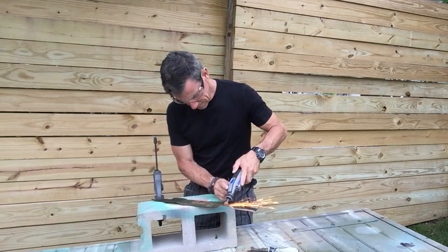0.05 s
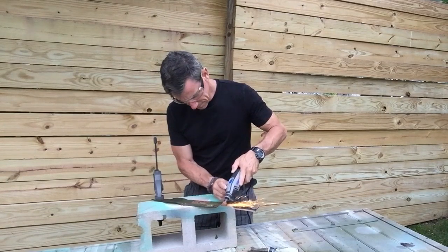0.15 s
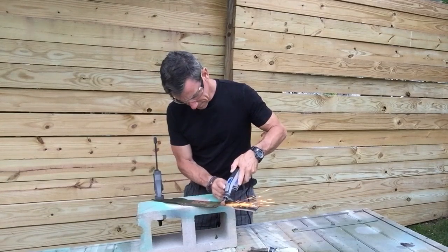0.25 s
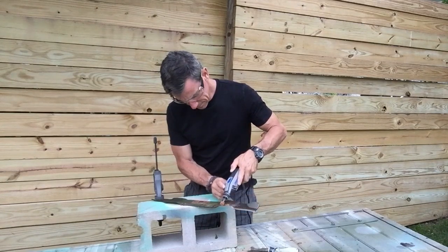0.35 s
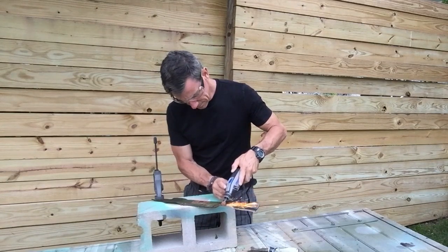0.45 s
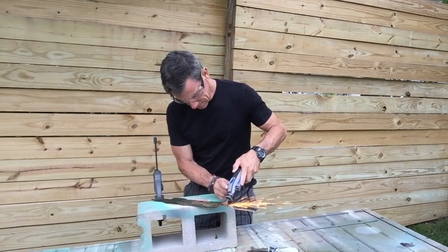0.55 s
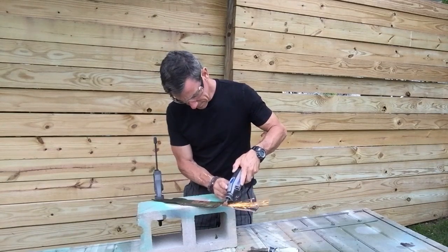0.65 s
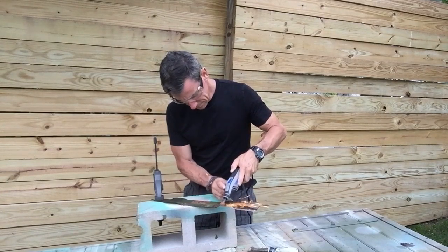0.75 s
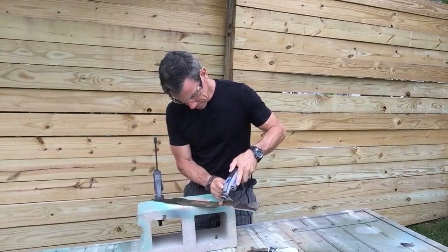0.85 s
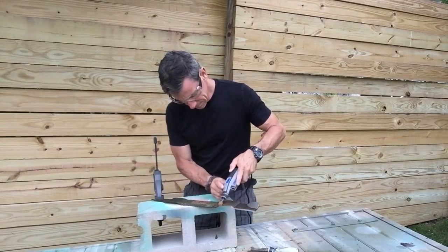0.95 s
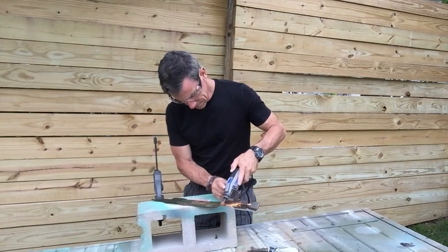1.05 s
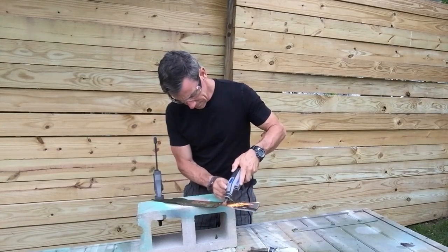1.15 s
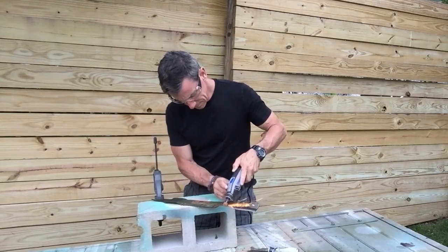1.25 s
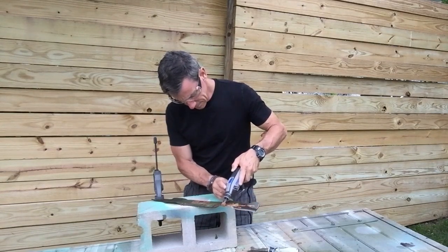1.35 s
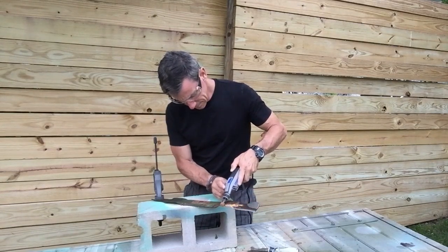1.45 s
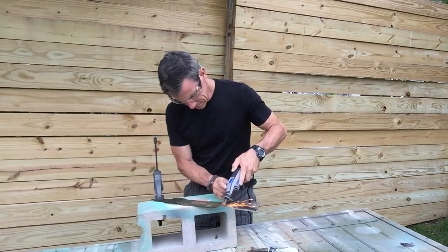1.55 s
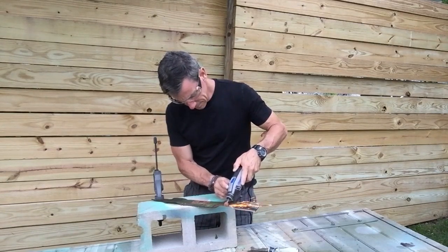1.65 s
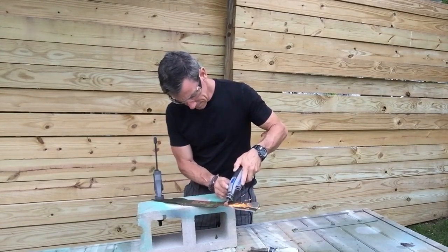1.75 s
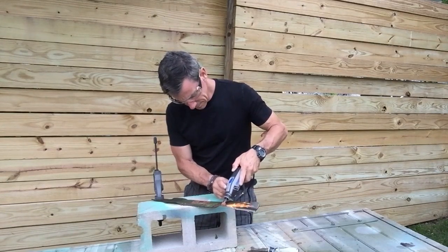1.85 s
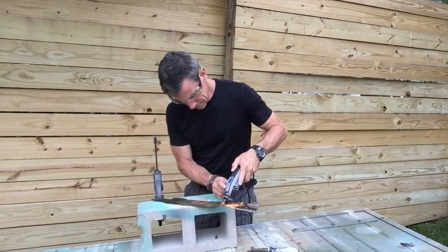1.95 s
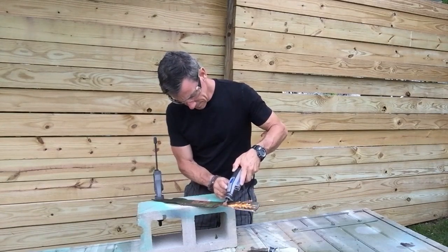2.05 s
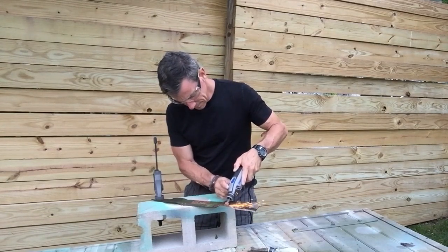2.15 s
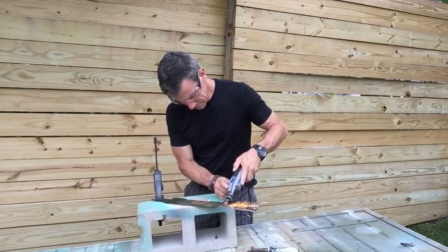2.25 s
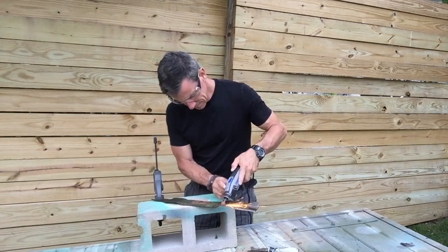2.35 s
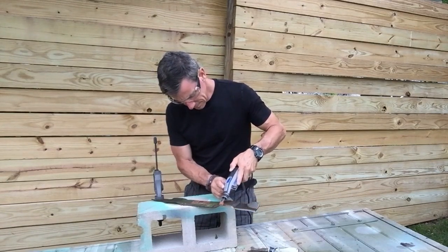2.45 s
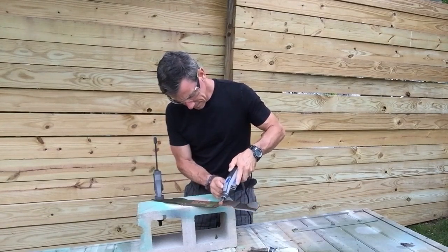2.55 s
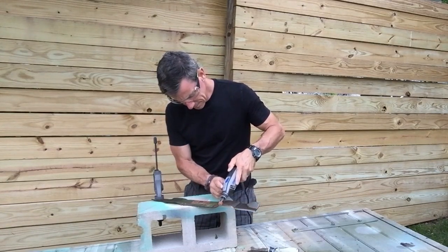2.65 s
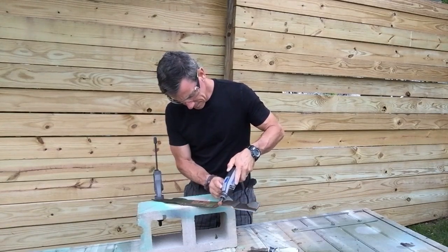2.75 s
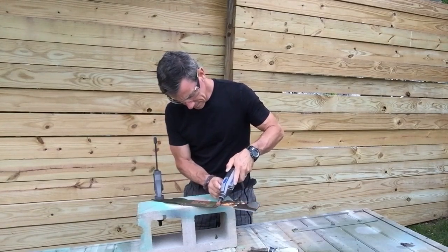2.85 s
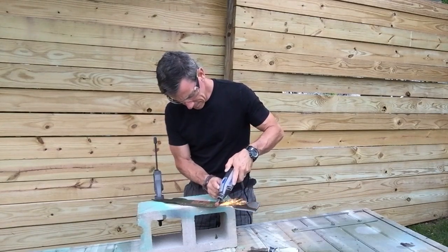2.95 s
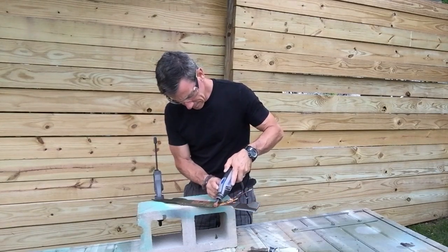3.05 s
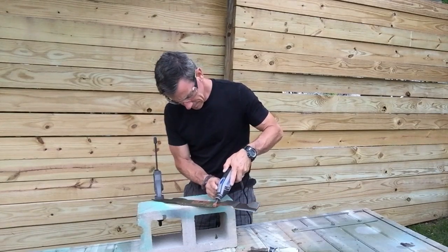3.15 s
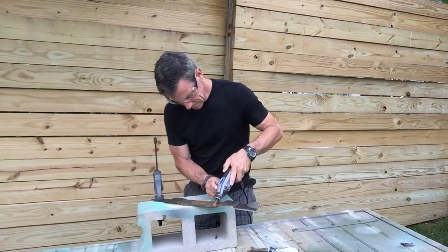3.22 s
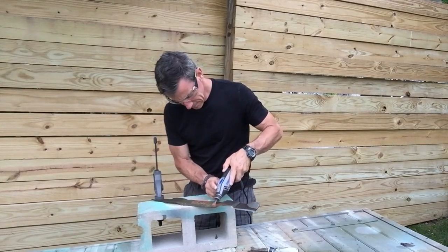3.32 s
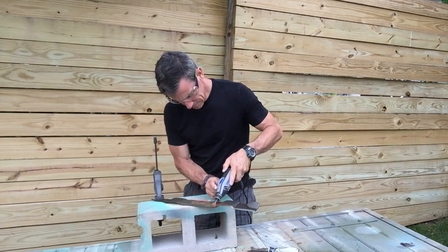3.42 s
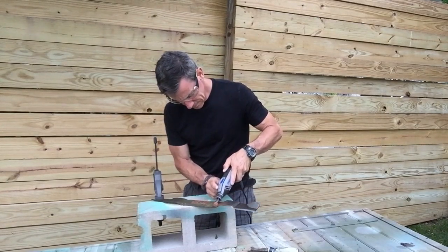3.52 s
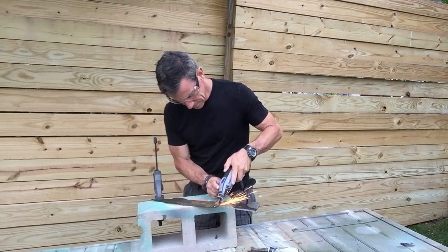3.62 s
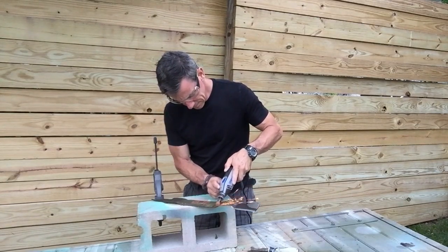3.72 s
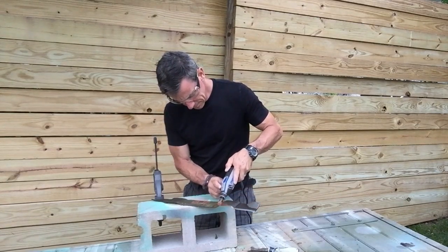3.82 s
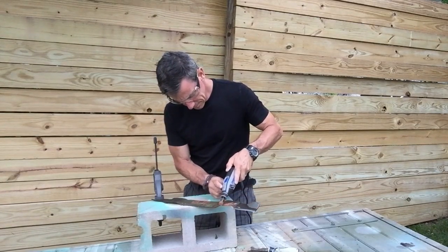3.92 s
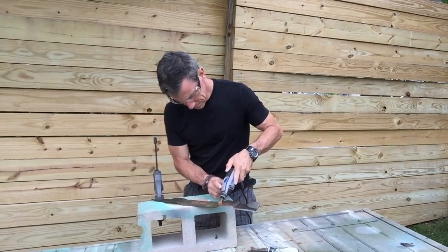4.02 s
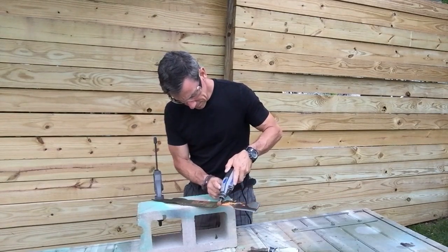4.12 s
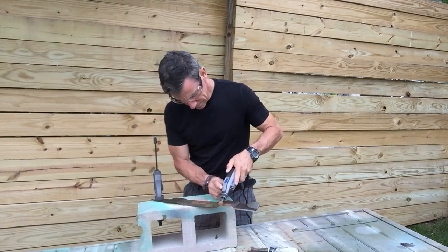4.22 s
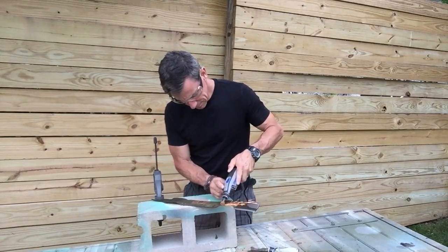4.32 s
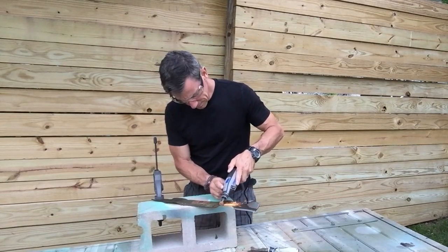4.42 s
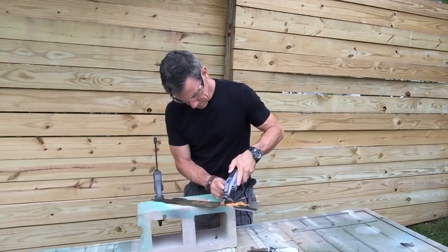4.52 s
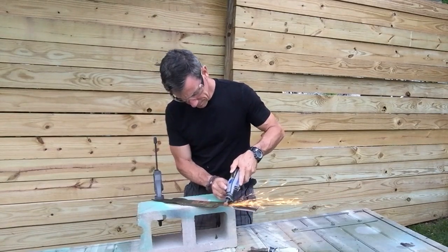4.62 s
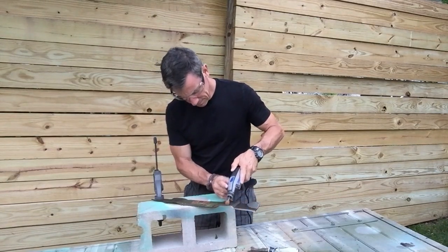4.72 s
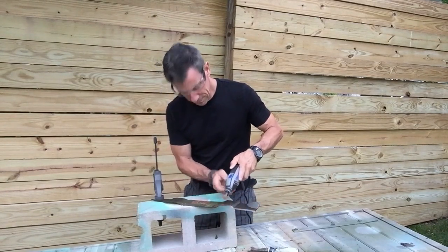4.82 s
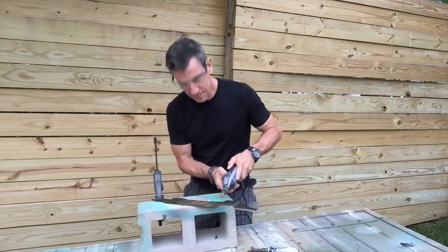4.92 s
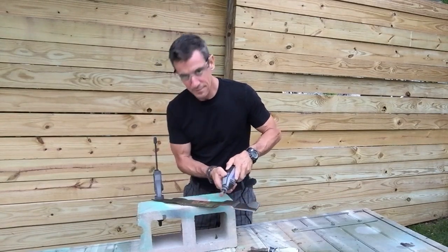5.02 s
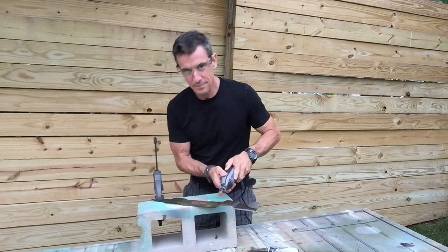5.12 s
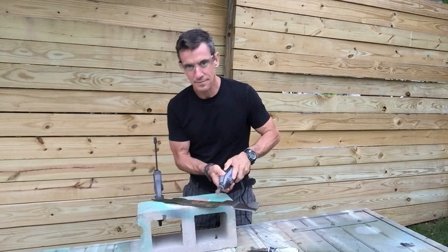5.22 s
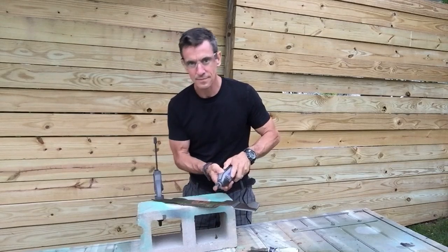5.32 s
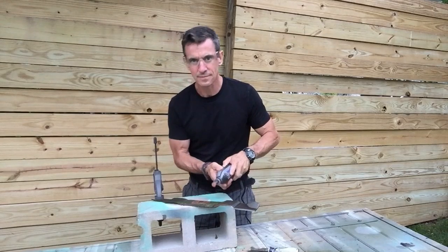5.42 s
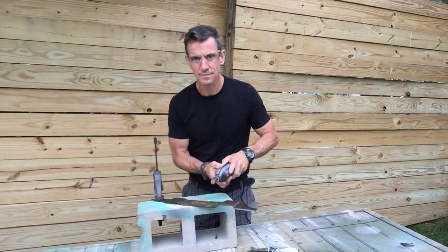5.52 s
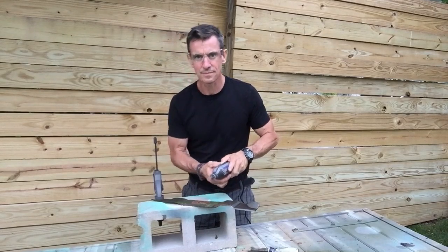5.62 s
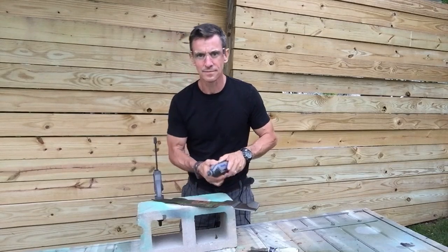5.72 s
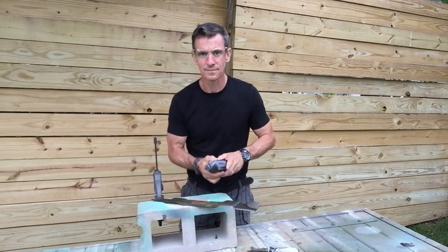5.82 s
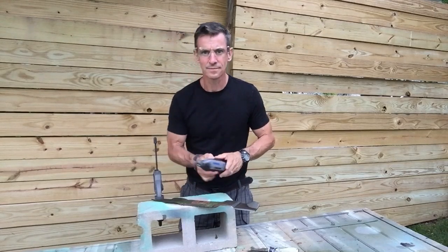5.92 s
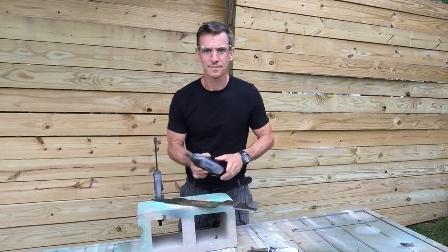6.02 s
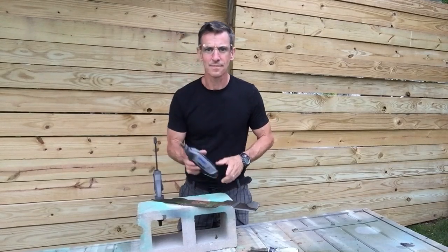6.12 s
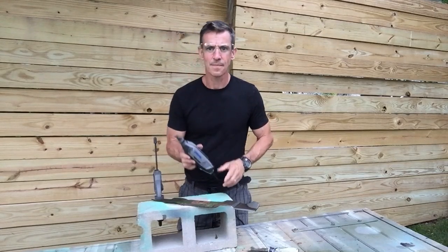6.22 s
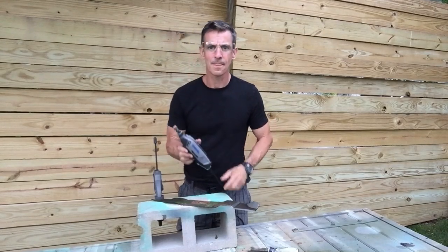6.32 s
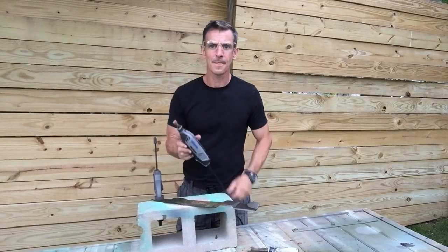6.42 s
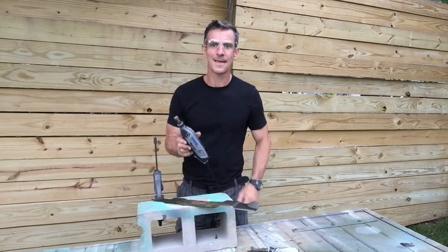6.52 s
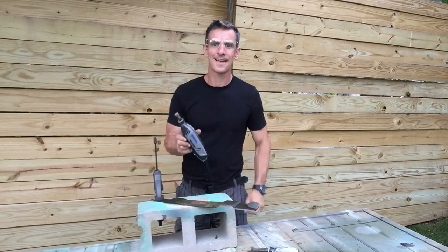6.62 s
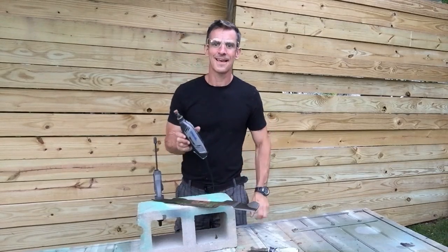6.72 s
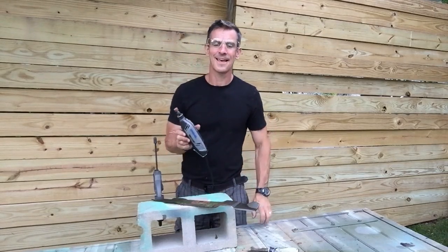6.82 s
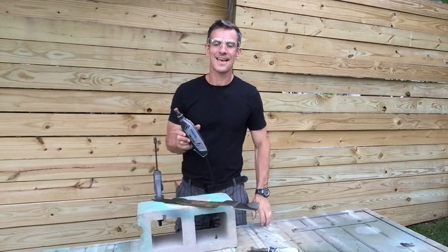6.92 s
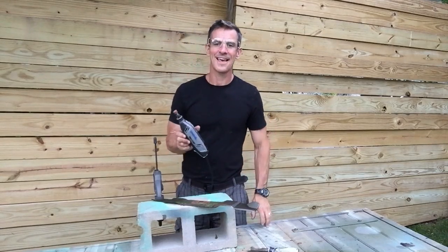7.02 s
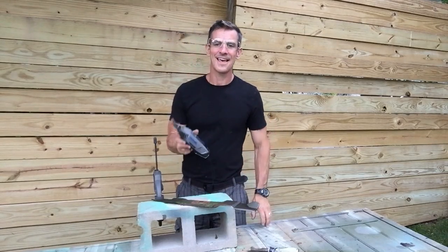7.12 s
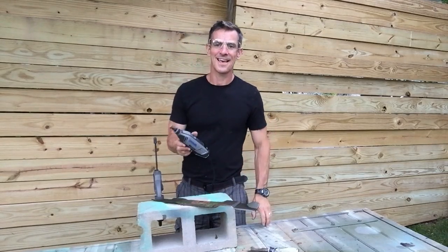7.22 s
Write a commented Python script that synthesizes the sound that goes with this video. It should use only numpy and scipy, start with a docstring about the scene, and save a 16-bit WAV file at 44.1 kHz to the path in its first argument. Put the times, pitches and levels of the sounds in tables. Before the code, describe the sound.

Outdoors, a small rotary tool's wheel grinds a steel blade edge with a bright, piercing buzz and gritty rasp, wavering as the hand strokes to and fro. It chatters in bouts while the blade rings. Near five seconds it lifts off, the motor briefly speeds up, then switches off and coasts down in a falling whine. Faint hiss and low rumble remain. Steady microphone a few steps away, identical in both channels.

```python
"""A rotary tool's wheel buzzes, rasps and chatters on the edge of a steel blade, outdoors, and the blade rings.
It touches once a turn: shaft orders buzz while it rides evenly, noise in the blade's modes rasps while it skips.
The hand eases it to and fro; place and pressure set how hard each family of modes is driven.
Lifted off, the motor speeds up, is switched off and coasts down, its orders sliding through resonances.
Air, brush and bearing hiss, dull bumps, soft thuds and a low outdoor rumble lie beneath."""
import sys
import numpy as np
from scipy import signal
from scipy.fft import rfft, irfft, next_fast_len
from scipy.io import wavfile
from scipy.ndimage import uniform_filter1d

SR = 44100
rng = np.random.default_rng(int(sys.argv[2]) if len(sys.argv) > 2 else 0)


def generate_wav(signal):
    """Clip the signal to [-1, 1] and save it as 16-bit WAV at the path in sys.argv[1]."""
    frames = np.transpose(np.atleast_2d(signal))
    scaled = np.clip(frames, -1, 1) * 32767
    pcm = np.round(scaled).astype(np.int16)
    wavfile.write(sys.argv[1], SR, pcm)


N = 320607
TIME = np.arange(N) / SR
LIFT_S, CUTOFF_HZ = 4.78, 15800


def from_db(db):
    """Decibels to gain."""
    return 10 ** (np.asarray(db) / 20)


def rms_one(x):
    """Scale to unit power."""
    return x / np.sqrt(np.mean(x ** 2) + 1e-20)


def levelled(x, size=1300):
    """Hold the power at one over size samples, leaving the fine grain."""
    power = np.abs(uniform_filter1d(x * x, size))
    return x / np.sqrt(power + 1e-12)


def in_time(rows):
    """Interpolate each column of a time curve at every sample."""
    s, *columns = np.transpose(rows)
    return [np.interp(TIME, s, column) for column in columns]


def at_hz(points, hz):
    """Read a spectrum on a log-frequency axis."""
    f, db = np.transpose(points)
    return np.interp(np.log(hz), np.log(f), db)


def drift(rate_hz):
    """Smooth chance with spread 1, renewed rate_hz times a second."""
    knots = rng.standard_normal(8000)
    return np.interp(TIME * rate_hz, np.arange(len(knots)), knots) / np.sqrt(2 / 3)


def bells(rows):
    """A bell-shaped rise or dip for each (s, height, length s)."""
    return sum(height * np.exp(-((TIME - s) / length) ** 2 / 2) for s, height, length in rows)


def swells(rows):
    """A bell-shaped swell for each (s, dB, length s)."""
    return bells([(s, from_db(db), length) for s, db, length in rows])


def bouts(rows, edge_s, least):
    """Rise, hold and fall for each (start s, end s, share), never below the least share."""
    held = 0
    for start, end, share in rows:
        inside_s = np.minimum(TIME - start, end - TIME)
        held = held + share * np.clip(inside_s / edge_s + .5, 0, 1)
    return np.clip(np.maximum(held, least), 0, 1)


def band(x, low_hz, high_hz, order=2):
    """Butterworth band-pass."""
    edges_hz = [low_hz, min(high_hz, .45 * SR)]
    return signal.sosfilt(signal.butter(order, edges_hz, "band", fs=SR, output="sos"), x)


def resonance(x, hz, width_hz):
    """Two-pole resonance with gain 1 on top."""
    r = np.exp(-np.pi * width_hz / SR)
    zeros = np.array([1, 0, -1]) * (1 - r * r) / 2
    poles = [1, -2 * r * np.cos(2 * np.pi * hz / SR), r * r]
    return signal.lfilter(zeros, poles, x + 1e-18)


def noise(spectrum):
    """Coloured noise of unit power, rolling off beyond the ends of its spectrum."""
    size = next_fast_len(N)
    hz = np.maximum(np.fft.rfftfreq(size, 1 / SR), 1)
    ends = np.minimum(hz / spectrum[0][0], 1) * np.minimum(spectrum[-1][0] / hz, 1)
    white = rfft(rng.standard_normal(size))
    return rms_one(irfft(white * from_db(at_hz(spectrum, hz)) * ends ** 2, size)[:N])


def tone(turns, order):
    """One shaft order: a unit-power sine at a multiple of the turning rate."""
    cycles = order * turns + rng.random()
    phase = (cycles - np.floor(cycles)).astype(np.float32)
    return np.sqrt(2) * np.sin(2 * np.pi * phase)


def grinding(turns, surge, even, place, pressure_db):
    """Grit strikes the blade once a turn: alike on every turn it buzzes, unalike it rasps in the modes."""
    # Blade and wheel modes. Each row: frequency in Hz, width in Hz, level in dB.
    blade = [(2450, 185, -8.5), (2966, 19, -5.5), (3245, 120, -8), (3582, 67, -4.5), (4095, 140, -17),
             (4450, 130, -11.5), (4640, 46, -22), (5266, 33, -3), (5820, 104, 3.5), (6350, 120, -14),
             (7085, 64, -9.5), (7530, 310, -14), (8080, 160, -8.5), (8450, 60, -4.5), (9225, 150, -9.5),
             (10070, 140, -15.5), (10840, 92, -6), (12060, 110, -8.5), (12930, 270, -20), (14000, 120, -21),
             (15600, 110, -15)]
    # Evenly riding wheel. Each row: shaft order, level in dB.
    buzz_orders = [(6, 5.5), (7, 0), (8, -2.5), (9, 1.5), (10, -7), (11, -12), (12, 2), (13, -16),
                   (14, -2.5), (15, -6.5), (16, -8), (17, -2), (18, -8), (19, -5), (20, -27), (21, -9),
                   (22, -39), (23, -6.5), (24, -11), (25, -30), (26, -18), (27, -43), (28, -18), (29, -25),
                   (30, -14)]
    # Families of modes. Each row: level in dB, change from end to end of the stroke in dB,
    # dB per dB of pressure, dB gained when riding evenly,
    # looseness (high keeps step with the wheel less readily).
    families = [(-29.5, -3.5, 0.45, -3, 0.41), (-40.5, 15.5, 0.6, 0, 0.32), (-22.5, -5.5, 1.9, -2, 1.25),
                (-27, -1.6, 1.2, 2, 0.88)]
    # Rasp near 3 kHz. Each row: time in seconds, level in dB.
    middle_level = [(0, 2.5), (.3, 2), (.55, -1.5), (1.0, 1.5), (1.9, 3), (2.4, -1), (3.1, 1), (3.9, -2.5),
                    (4.5, -3), (4.73, 3)]
    # Treble spray. Each row: time in seconds, level in dB.
    treble_level = [(0, 0.5), (.5, 1.5), (.88, -1.5), (1.3, -1.5), (2.0, -.5), (2.3, 1.5), (2.54, -4.5),
                    (2.75, -2.5), (3.2, .5), (3.4, -7.5), (3.75, 2.5), (3.95, -1.5), (4.06, 4), (4.3, -4.5),
                    (4.42, 3.5), (4.62, 0), (4.78, -5.5)]
    grain_db, skip_db, turn_depth = 2.0, -2.0, 0.48
    wander_db, scrape_db = 2.5, -25
    sway_db, flutter_db, judder_db = 2.6, 1.23, 0.66
    zones_hz = [(2550, 3850), (3850, 4900), (4900, 6700), (6700, 16000)]

    grit_db = grain_db * rng.standard_normal(N) + skip_db * drift(220)
    grit = rng.standard_normal(N) * from_db(grit_db)
    grit = grit * surge * (1 + turn_depth * np.cos(2 * np.pi * turns))
    rasp = from_db(scrape_db) * grit
    # each mode swells and fades by chance
    for hz, width_hz, db in blade:
        rasp = rasp + from_db(db + wander_db * drift(5.12)) * resonance(grit, hz, width_hz)

    # the moment of touch wavers a little
    touch = turns + .003 * drift(150)
    buzz = 0
    for order, db in buzz_orders:
        order_db = db + sway_db * drift(4) + flutter_db * drift(55)
        buzz = buzz + from_db(order_db) * tone(touch, round(order))

    trends_db = (*in_time(middle_level), 0, 0, *in_time(treble_level))
    out = 0
    for (low, high), family, trend_db in zip(zones_hz, families, trends_db):
        db, place_db, per_pressure, riding_db, looseness = family
        level_db = db + trend_db + place_db * place + per_pressure * pressure_db + riding_db * even
        share = np.clip(even, 1e-3, 1) ** looseness
        buzz_part = levelled(band(buzz, low, high, order=4))
        rasp_part = levelled(band(rasp, low, high, order=4), size=2000)
        mix = np.sqrt(share) * buzz_part + np.sqrt(1 - share) * rasp_part
        out = out + from_db(level_db) * mix
    return out * from_db(judder_db * drift(35)) * touching()


def touching(release_s=0.045):
    """One while the wheel is on the steel, zero once it is lifted."""
    return np.clip((LIFT_S - TIME) / release_s + .5, 0, 1)


def hand():
    """Place and pressure ease from one end of a stroke to the next; bites and slips jolt the pressure."""
    # Stroke ends. Each row: time in seconds, place along the edge 0-1, pressure in dB.
    strokes = [(0.11, 0.46, 1.4), (0.15, 0.3, -0.5), (0.29, 0.9, 0.75), (0.54, 0.94, 0), (0.64, 0.26, 0.8),
               (1.01, 1.0, 0.4), (1.36, 0.45, 1.8), (1.51, 0.76, 1.3), (1.82, 0.19, 0.5), (2.04, 0.82, 1.7),
               (2.22, 0.0, 0.5), (2.64, 0.91, 2.3), (2.97, 0.62, 1.2), (3.08, 0.4, -4), (3.52, 0.59, 0),
               (3.78, 0.16, 0.8), (3.9, 0.4, -0.3), (4.1, 0.72, -3.5), (4.51, 0.88, -0.2),
               (4.59, 0.67, 1.9)]
    # Bites (+) and slips (-). Each row: time in seconds, pressure in dB, length in seconds.
    jolts = [(0.23, -1, 0.025), (0.91, -0.3, 0.014), (1.42, -2, 0.034), (1.94, -1.5, 0.024),
             (3.1, 5, 0.055), (4.06, 4, 0.035), (4.21, 6, 0.064), (4.34, -1, 0.015), (4.57, -5, 0.015),
             (4.69, -2.5, 0.0092)]
    s, place, pressure_db = np.transpose(strokes)
    steps = np.arange(len(s))
    progress = np.interp(TIME, s, steps)
    eased = progress - np.sin(2 * np.pi * progress) / (2 * np.pi)
    return np.interp(eased, steps, place), np.interp(eased, steps, pressure_db) + bells(jolts)


def chatter_depth():
    """How deeply the wheel hops on the edge, in bouts, until it is lifted."""
    # Each row: start in seconds, end in seconds, depth 0-1.
    chatters = [(.62, .95, 0.24), (1.52, 2.03, .28), (2.03, 2.47, 0.46), (2.86, 3.02, .24),
                (3.63, 4.0, 0.72), (4.0, 4.3, 0.22)]
    return bouts(chatters, edge_s=.07, least=0.077) * touching()


def even_riding(depth):
    """Share of even riding as the wheel settles; hopping upsets it."""
    # Each row: start in seconds, end in seconds, share of even riding 0-1 before hopping upsets it.
    rides = [(-.1, .14, 0.62), (.2, .58, 0.6), (.85, 1.42, 0.29), (1.92, 1.98, 0.35), (2.54, 2.85, 0.82),
             (3.0, 3.15, 0.36), (3.15, 3.6, 0.55), (4.22, 4.36, 0.42), (4.36, 4.77, 0.64)]
    upset_per_depth = 1.11
    return bouts(rides, edge_s=.06, least=.12) * np.clip(1 - upset_per_depth * depth, 0, 1)


def chatter(turns, depth, decay=0.75, swing=0.3):
    """The wheel hops about every sixth turn; each landing is a surge that dies away."""
    hop = (turns / 6 + .06 * drift(4)) % 1
    surge = uniform_filter1d(np.exp(-decay * hop), size=12)
    return np.maximum(1 + swing * depth * (surge - surge.mean()) / surge.std(), 0)


def shaft_speed():
    """Held back by the steel, then running up freely, then coasting against friction and air drag."""
    # Speed on the steel. Each row: time in seconds, speed in turns per second.
    loaded_speed = [(0, 497), (.25, 503), (1.25, 504.2), (1.7, 508.3), (2.45, 513.4), (2.8, 504.8),
                    (3.55, 500.8), (3.87, 506.5), (4.27, 506.5), (4.62, 500.8), (4.73, 494.7)]
    top_turns_per_s, run_up_s, switch_off_s = 556, .345, 5.3
    # friction in turns per s, per s; air drag equals it at drag_turns_per_s
    friction, drag_turns_per_s = 175.2, 554.2
    loaded, = in_time(loaded_speed)
    free_from_s = loaded_speed[-1][0]
    free_s = np.clip(TIME, free_from_s, switch_off_s) - free_from_s
    driven = top_turns_per_s + (loaded - top_turns_per_s) * np.exp(-free_s / run_up_s)
    coast_s = np.maximum(TIME - switch_off_s, 0)
    angle = np.arctan(driven / drag_turns_per_s) - friction * coast_s / drag_turns_per_s
    return drag_turns_per_s * np.tan(angle)


def whine(speed, turns, surge, place, depth):
    """Unbalance hums on order 1, contact adds to 2 and 4; orders 2-4 shake with every hop of the wheel."""
    # Radiation of the four lowest shaft orders. Each row: frequency in Hz, level in dB.
    first_order = [(200, -78), (285, -65), (335, -57), (365, -43), (392, -38), (420, -49), (460, -48.5),
                   (545, -50)]
    second_order = [(400, -69), (700, -72), (880, -48.5), (1000, -67), (1090, -45)]
    third_order = [(500, -68), (800, -59), (910, -46), (1100, -48.5), (1200, -39.5), (1310, -29),
                   (1410, -32.5), (1510, -30.5), (1630, -29)]
    fourth_order = [(600, -71), (1100, -55), (1380, -45.5), (1750, -46), (2050, -74), (2120, -40),
                    (2175, -32)]
    # Hum, also steering the contact part of orders 2 and 4. Each row: time in seconds, level in dB.
    hum_level = [(0, 0.5), (2.4, 0.5), (2.8, 4), (4.4, 2.5), (4.9, -1.5)]
    # Brief dip of the third order. Each row: time in seconds, change in dB, length in seconds.
    dropout = [(4.67, -13.5, 0.056)]
    # Tool body, knocked by landings. Each row: frequency in Hz, width in Hz, relative level in dB.
    body_modes = [(340, 50, -21), (930, 30, -6), (1400, 130, 0), (1820, 150, 0)]
    second_db, second_place_db = -46.5, 6.0
    fourth_db, fourth_place_db, fourth_hum = -47, 5.0, 2.26
    handover, hop_loss_db, waver_db = 0.67, -1.5, 0.98
    drag, knock_db = 0.92, -45

    first = from_db(at_hz(first_order, speed))
    second = from_db(at_hz(second_order, 2 * speed))
    third = from_db(at_hz(third_order, 3 * speed))
    fourth = from_db(at_hz(fourth_order, 4 * speed))
    hum_db, = in_time(hum_level)
    second_contact_db = second_db + second_place_db * place + hum_db
    fourth_contact_db = fourth_db + fourth_place_db * place + fourth_hum * hum_db
    second = np.hypot(second, touching() * from_db(second_contact_db))
    fourth = np.hypot(fourth, touching() * from_db(fourth_contact_db))
    # the fourth swells while the third dips
    dip_db = bells(dropout)
    third, fourth = third * from_db(dip_db), fourth * from_db(-handover * dip_db)

    # each landing holds the shaft back for a moment
    lag = signal.lfilter([1], [1, -.99], (surge - 1) * speed / SR)
    dragged = turns - drag * lag / 6
    shaken = 0
    for order, gain in ((2, second), (3, third), (4, fourth)):
        shake_db = hop_loss_db * depth + waver_db * drift(70)
        shaken = shaken + gain * from_db(shake_db) * tone(dragged, order)

    # the exponent favours hard landings
    landing = np.maximum(np.diff(surge, prepend=1), 0) ** 1.1
    knock = 0
    for k, (hz, width_hz, db) in enumerate(body_modes):
        knock = knock + (-1) ** k * from_db(db) * resonance(landing, hz, width_hz)
    hum = first * from_db(hum_db) * tone(turns, order=1)
    return hum + shaken * surge + from_db(knock_db) * rms_one(knock)


def siren(speed, turns, flutter_db=3.5):
    """Fan blades (order 7) and commutator (order 16) each sing one clear, fluttering tone."""
    # Radiation of each tone as its pitch moves. Each row: frequency in Hz, level in dB.
    fan_tone = [(800, -70), (1000, -57), (1750, -57), (2500, -48), (2950, -40.5), (3450, -40),
                (3850, -45.5)]
    commutator_tone = [(1400, -74), (2150, -50.5), (2700, -57), (3400, -53), (4000, -47.5), (4500, -57),
                       (6000, -57), (7300, -51), (8700, -59)]
    out = 0
    for order, response in ((7, fan_tone), (16, commutator_tone)):
        level_db = at_hz(response, order * speed) + flutter_db * drift(60)
        out = out + from_db(level_db) * tone(turns, order)
    return out


def motor(speed, turns, flutter_db=5.0):
    """With the wheel lifted, high shaft orders are heard, each swelling as it crosses a housing resonance."""
    # Orders that stand out of the rest. Each row: shaft order, gain in dB.
    strong_orders = [(5, 0), (6, 1), (8, 5), (9, 8), (10, 7), (11, 9), (12, 3), (13, 5), (14, 2), (17, 3),
                     (19, 3), (21, 3), (24, 11), (26, 4), (32, 10), (40, 13), (48, 13), (56, 14), (64, 15),
                     (72, 14), (80, 11)]
    # Housing radiation. Each row: frequency in Hz, level in dB.
    housing = [(500, -28), (1000, -12), (1380, -5), (1510, 6), (1660, -6), (2000, -7), (2300, -2.5),
               (2700, -8.5), (3450, 2), (4400, -5), (5200, -4), (7000, -5.5), (8400, -3.5), (10500, -7),
               (16000, -23)]
    # level at full speed; change per doubling of order and of speed
    base_db, per_order_db, per_speed_db = -40.8, -4.2, 5.2
    out, strong = np.zeros(N), dict(strong_orders)
    free = slice(int(LIFT_S * SR), None)
    coarse = slice(free.start, None, 100)
    # orders 7 and 16 belong to fan and commutator
    for order in sorted({*range(5, 60), *strong} - {7, 16}):
        hz = order * speed[coarse]
        db = strong.get(order, 0) + per_order_db * np.log2(order) + at_hz(housing, hz)
        db = db + flutter_db * rms_one(uniform_filter1d(rng.standard_normal(len(hz)), size=8))
        gain = np.interp(TIME[free], TIME[coarse], from_db(db) * (hz < CUTOFF_HZ))
        out[free] += gain * tone(turns[free], order)
    return out * from_db(base_db + per_speed_db * np.log2(speed / speed.max()))


def flares(speed, turns, flutter_db=2.7):
    """As the shaft slows, odd orders flare up while sliding through resonances of the air passage."""
    # Air passage resonances. Each row: frequency in Hz, width in Hz, level in dB.
    passage = [(1190, 170, -53), (1353, 56, -42.5), (1477, 42, -27), (1650, 63, -37.5)]
    # Orders that blow through it. Each row: shaft order, relative level in dB.
    passage_orders = [(7, 0), (9, -21), (11, -10.5), (13, -30)]
    out = 0
    for order, order_db in passage_orders:
        order_hz = round(order) * speed
        gain = sum(from_db(db) / (1 + (2 * (order_hz - hz) / width_hz) ** 2) for hz, width_hz, db in passage)
        out = out + gain * from_db(order_db + flutter_db * drift(60)) * tone(turns, round(order))
    return out


def air(speed):
    """Fan rush and brush hiss lose their top as the shaft slows; bearing hiss and housing ring on steadily."""
    # Rush and hiss. Each row: time in seconds, level in dB before the trim.
    air_level = [(4.7, -31.5), (4.85, -31.5), (5.06, -29), (5.35, -29.5), (5.65, -32.5), (6.0, -35.5),
                 (6.3, -40.5), (6.7, -44.5), (6.9, -50), (7.27, -51.5)]
    # Their colour at full speed. Each row: frequency in Hz, relative level in dB per Hz.
    air_colour = [(300, -30), (750, -28), (1120, -18), (1350, -18), (1530, -12), (1750, -16.5),
                  (2150, -13.5), (2500, -17), (3500, -15.5), (4400, -20.5), (8400, -20), (10500, -26),
                  (11500, -22), (16000, -24.5)]
    # Bearing hiss colour. Each row: frequency in Hz, relative level in dB per Hz.
    bearing_colour = [(6500, -23), (7700, -4), (8400, 2), (9000, -2), (10000, -8), (11500, -22)]
    dulling_db, pivot_hz = 12.0, 6000  # dB per halving of speed, above the pivot
    bearing_db, housing_db, trim_db = -57, -56, -0.74
    level_db, = in_time(air_level)
    rush = noise(air_colour)
    body = signal.sosfilt(signal.butter(1, pivot_hz, fs=SR, output="sos"), rush)
    rush = body + (rush - body) * from_db(dulling_db * np.log2(speed / speed.max()))
    ringing = rms_one(resonance(rng.standard_normal(N), hz=1556, width_hz=47))
    hiss = from_db(bearing_db) * noise(bearing_colour)
    return from_db(level_db + trim_db) * rush + hiss + from_db(housing_db) * ringing


def yard():
    """A low outdoor rumble of coloured noise, with swells of it as dull bumps and soft, deep thuds."""
    # Outdoor background colour. Each row: frequency in Hz, relative level in dB per Hz.
    yard_colour = [(25, -29), (45, -6), (65, 0.5), (120, -2), (200, -7), (400, -16.5), (900, -13.5),
                   (2000, -18), (6000, -52)]
    # Background. Each row: time in seconds, level in dB.
    yard_level = [(0, -55), (2.8, -54.5), (3.7, -57), (6.3, -51), (7.27, -52)]
    # Dull bumps. Each row: time in seconds, level in dB, length in seconds.
    bumps = [(0.037, -35.5, 0.017), (0.401, -37.5, 0.017), (0.727, -41, 0.018), (3.545, -48.5, 0.016),
             (5.675, -42, 0.0095)]
    # Bump colour. Each row: frequency in Hz, relative level in dB per Hz.
    bump_colour = [(50, -26), (150, 7), (280, 6.5), (500, 5), (1200, -14), (2500, -35)]
    # Deep thuds. Each row: time in seconds, level in dB, length in seconds.
    thuds = [(4.06, -49, 0.013), (4.38, -48, 0.027), (6.45, -46, 0.023), (6.52, -45.5, 0.024)]
    level_db, = in_time(yard_level)
    deep = rms_one(resonance(noise(yard_colour), hz=112, width_hz=35))
    rumble = from_db(level_db) * noise(yard_colour)
    return rumble + swells(bumps) * noise(bump_colour) + swells(thuds) * levelled(deep)


def scene():
    """One shaft drives every part of the tool; both channels hear the same."""
    speed = shaft_speed()
    turns = np.cumsum(speed) / SR
    place, pressure_db = hand()
    depth = chatter_depth()
    even = even_riding(depth)
    surge = chatter(turns, depth)
    mono = grinding(turns, surge, even, place, pressure_db)
    mono = mono + whine(speed, turns, surge, place, depth) + siren(speed, turns)
    mono = mono + motor(speed, turns) + flares(speed, turns) + air(speed) + yard()
    return np.stack([mono, mono])


def record(dry):
    """A steep elliptic low-pass cuts the top."""
    return signal.sosfilt(signal.ellip(12, .1, 80, CUTOFF_HZ, fs=SR, output="sos"), dry)


dry = scene()
out = record(dry)
generate_wav(out)
```